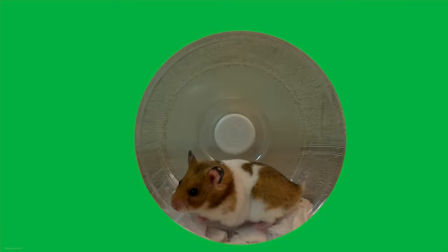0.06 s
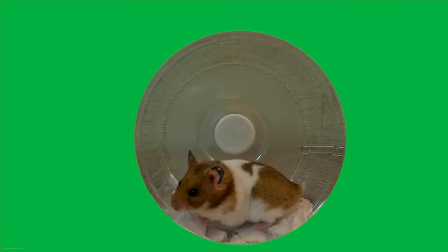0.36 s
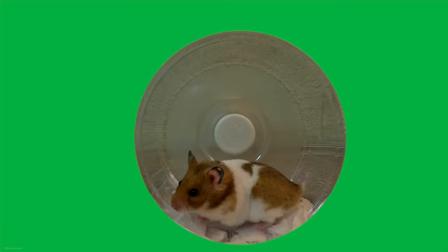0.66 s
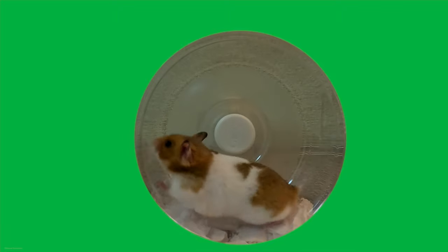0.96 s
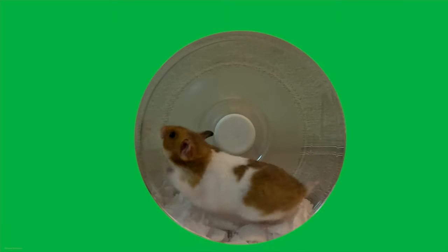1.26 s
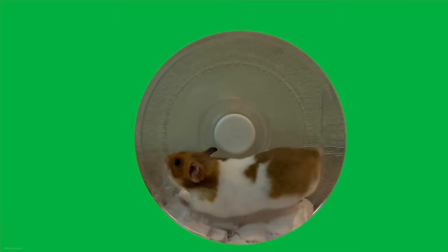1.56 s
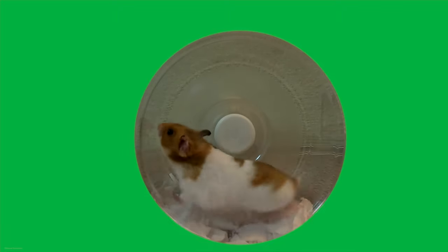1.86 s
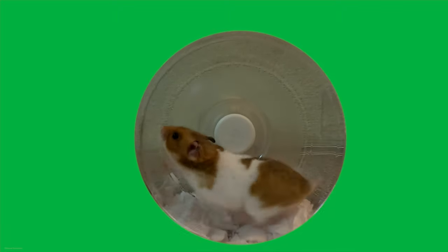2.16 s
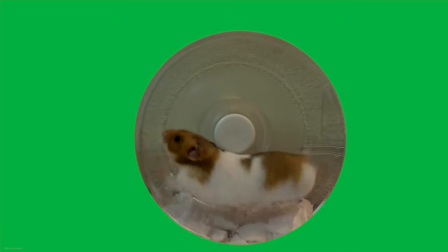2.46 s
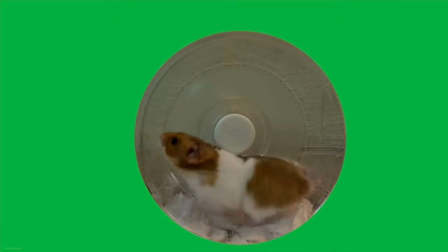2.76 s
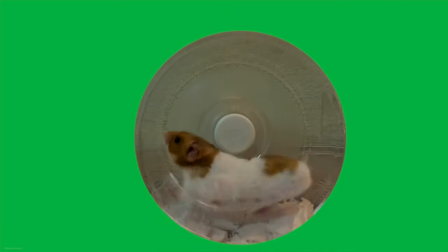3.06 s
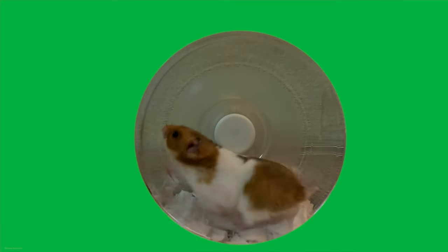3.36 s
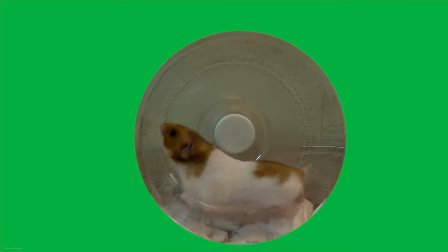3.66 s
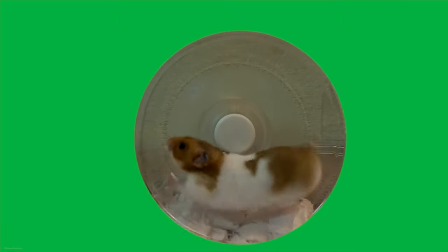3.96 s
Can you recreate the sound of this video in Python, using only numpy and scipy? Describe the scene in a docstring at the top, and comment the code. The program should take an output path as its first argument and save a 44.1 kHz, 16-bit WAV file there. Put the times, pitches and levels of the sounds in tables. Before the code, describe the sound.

A plastic exercise wheel rumbles and rattles as a hamster's claws tick on it.

```python
"""Hamster in a plastic wheel

A quiet room, stereo microphone close to the wheel, which stands slightly to the right.
The hamster walks, then runs: its strides thump wheel and stand, which rumble in low modes,
and its claws tick on the drum. At speed the drum rattles and clacks on its loose axle.
Now and then plastic slips on plastic with a faint squeak."""
import sys
import numpy as np
from scipy import signal
from scipy.fft import rfft, irfft
from scipy.io import wavfile
from scipy.ndimage import uniform_filter1d

SR = 44100
rng = np.random.default_rng(int(sys.argv[2]) if len(sys.argv) > 2 else 0)


def put_to_file(sound):
    """Save the sound as 16-bit audio at rate SR, in the file named by the first command-line argument."""
    columns = np.atleast_2d(sound).T  # one column per channel
    safe = np.clip(columns, -1, 1)
    whole_steps = np.round(safe * 32767)
    wavfile.write(sys.argv[1], SR, whole_steps.astype(np.int16))


N = 176400
T = np.arange(N) / SR


def undb(db):
    """Decibels to gain."""
    return 10 ** (np.asarray(db) / 20)


def unit(x):
    """Scale to rms 1."""
    return x / np.sqrt(np.mean(x ** 2))


def curve(points):
    """Gain over time from points of t/s, level/dB."""
    return undb(np.interp(T, *np.array(points).T))


def gains(points):
    """Gain at every frequency from points of f/Hz, level/dB."""
    hz, db = np.array(points).T
    bin_hz = np.arange(N + 1) * SR / (2 * N)
    return undb(np.interp(np.log(bin_hz + 1e-9), np.log(hz), db))


def colour(x, points):
    """Causal filter with the given spectrum; white noise keeps its level."""
    cepstrum = irfft(np.log(unit(gains(points))))
    cepstrum[1:N] *= 2  # fold to minimum phase
    cepstrum[N + 1:] = 0
    return irfft(rfft(x, 2 * N) * np.exp(rfft(cepstrum)))[:N]


def cut(x, hz, kind, order=2):
    """Low-pass or high-pass."""
    return signal.sosfilt(signal.butter(order, hz, kind, fs=SR, output="sos"), x)


def grains(per_s, spread_db):
    """Random tiny impacts of uneven size, rms 1."""
    impacts = (rng.random(N) < per_s / SR) * np.sign(rng.standard_normal(N))
    return unit(impacts * undb(spread_db * np.clip(rng.standard_normal(N), -2, 2)))


def add(out, start, x):
    """Mix x in at start seconds."""
    i = max(int(start * SR), 0)
    out[i:i + len(x)] += x[:max(N - i, 0)]


def ring(modes, jitter=0.0078, size=SR // 2):
    """Struck modes (f/Hz, t60/s, level/dB), each slightly detuned."""
    t = T[:size]
    return sum(undb(db) * np.exp(-np.log(1000) * t / t60)
               * np.sin(2 * np.pi * hz * (1 + jitter * rng.standard_normal()) * t)
               for hz, t60, db in modes)


def resonate(x, response):
    """Pass x through a ringing body, its response scaled to unit energy."""
    return signal.fftconvolve(x, response / np.sqrt(np.sum(response ** 2)))[:len(x)]


# Spectrum of the quiet room: f/Hz, relative level/dB
ROOM_SPECTRUM = [(12, -27), (20, 2.5), (33, -7), (80, -30.5), (161, -14.5), (248, -15), (299, -13.5),
                 (390, -23.5), (700, -30), (1400, -30.5), (2100, -40.5), (7410, -44.5), (12000, -59.5)]
def room_tone():
    """Steady faint air all around the microphone, a little stronger on the right."""
    level_db, width, right_db = -65.5, 0.69, 3.5
    mid, side = (colour(rng.standard_normal(N), ROOM_SPECTRUM) for _ in range(2))
    left_right = np.array([[1], [-1]])
    return undb(level_db - left_right * right_db / 2) * (mid + width * side * left_right)


def reflections(x, t60_s=0.11):
    """A short diffuse tail from the surfaces near the wheel."""
    t = T[:SR // 2]
    tail = rng.standard_normal(len(t)) * np.exp(-np.log(1000) * t / t60_s)
    return resonate(x, tail * (1 - np.exp(-t / 0.00033)))


def slip(length, from_hz, to_hz, db, octave_db):
    """Plastic slipping on plastic: an unsteady glide and its octave; long ones catch and restart."""
    longest_spurt_s = 0.08
    progress = np.arange(int(length * SR)) / (length * SR)
    waver, flutter = (unit(cut(rng.standard_normal(SR), 300, "low"))[-len(progress):] for _ in range(2))
    hz = (from_hz + (to_hz - from_hz) * progress) * (1 + 0.023 * waver)
    phase = 2 * np.pi * np.cumsum(hz) / SR
    tone = np.sin(phase) + undb(octave_db) * np.sin(2 * phase)
    spurts = np.abs(np.sin(np.pi * progress * np.ceil(length / longest_spurt_s)))
    return undb(db) * spurts * (1 + 0.65 * flutter) * tone


# Squeaks of the wheel: t/s, length/s, start f/Hz, end f/Hz, level/dB, octave re fundamental/dB
WHEEL_SQUEAKS = [(1.574, .31, 7180, 7200, -78.5, -24), (1.836, 0.061, 1340, 1875, -69.5, -14),
                 (1.989, 0.031, 2820, 2540, -69.5, -22), (2.061, 0.077, 2930, 2350, -65.5, -15),
                 (2.159, .055, 2233, 1820, -68.5, -17.5), (3.339, 0.038, 2670, 3326, -62, -14.5),
                 (3.76, 0.034, 3510, 3910, -58, -9.5)]
def squeaks():
    """The turning wheel gives a few clear squeaks among many tiny creaks."""
    out = np.zeros(N)
    for start, *shape in WHEEL_SQUEAKS:
        add(out, start, slip(*shape))
    first_creak_s, creaks_per_s, low_hz, high_hz = 1.14, 26, 1350, 2400
    for k, (late, pitch, glide, size) in enumerate(rng.random((80, 4))):
        from_hz = low_hz * (high_hz / low_hz) ** pitch
        to_hz = from_hz * (1 + 0.35 * (glide - 0.5))
        creak = slip(0.018, from_hz, to_hz, db=-74 + 8 * (size - 0.5), octave_db=-19.5)
        add(out, first_creak_s + (k + late) / creaks_per_s, creak)
    return out


# Clacks of the loose axle: t/s, level/dB
AXLE_CLACKS = [(2.422, -55.5), (2.454, -53), (2.521, -53), (2.542, -60), (2.571, -47.5), (2.615, -52.5),
               (2.665, -52.5), (2.71, -58.5), (2.807, -50), (2.856, -55), (3.188, -55), (3.217, -60),
               (3.237, -48.5), (3.287, -56.5)]
# Modes of the axle: f/Hz, t60/s, relative level/dB
AXLE_MODES = [(925, 0.025, 5.5), (1600, 0.015, -11), (2666, 0.024, 0), (2820, 0.017, 1.5), (4920, 0.013, 4)]
def axle_clacks():
    """The axle chatters in its bearing: a tiny crack and a ring that differs every time."""
    rise_s, crack_s = 0.001, 0.002
    out, t = np.zeros(N), T[:SR // 10]
    for start, db in AXLE_CLACKS:
        modes = [(hz, t60, mode_db + rng.normal(0, 2)) for hz, t60, mode_db in AXLE_MODES]
        tone = ring(modes, jitter=0.023, size=len(t))
        crack = np.exp(-t / crack_s) * unit(cut(rng.standard_normal(len(t)), 4000, "low"))
        add(out, start, undb(db) * (tone + crack) * (1 - np.exp(-t / rise_s)))
    return out


# Claws landing: t/s, relative level/dB, treble above 5 kHz/dB, scratch length/s, ring of the spot f/Hz
CLAW_LANDINGS = [(1.009, -72, 1, 0.049, 4000), (1.113, -61.5, -1.5, 0.012, 4090),
                 (1.243, -63.5, 4, 0.0062, 4190), (1.297, -63, -8, 0.017, 4300),
                 (1.354, -63, 1.5, 0.0062, 4060), (1.402, -61, -2.5, 0.015, 3250),
                 (1.45, -68, 9.5, 0.015, 6200), (1.501, -62.5, 12.5, 0.0097, 6100),
                 (1.539, -70, 9.5, .008, 4200), (1.652, -60.5, 5, 0.0082, 3680),
                 (1.704, -63.5, 2, 0.0082, 4490), (1.803, -62, -2.5, 0.015, 3300),
                 (1.901, -61.5, -4, 0.0075, 3760), (1.922, -58.5, -0.5, 0.015, 4170),
                 (2.021, -63, -2, 0.0086, 4200), (2.055, -60.5, -1.5, 0.03, 2730),
                 (2.147, -60.5, -9, 0.013, 6630), (2.171, -48.5, -3, 0.0028, 4150),
                 (2.214, -67.5, 8, 0.015, 6200), (2.287, -55, -4.5, 0.0062, 4400),
                 (2.374, -55.5, -12.5, 0.031, 3940), (2.401, -53.5, -11, 0.014, 6800),
                 (2.485, -53, -17.5, 0.025, 3600), (2.587, -60.5, -6, .012, 6770),
                 (2.682, -58.5, -2, 0.011, 3820), (2.756, -55.5, -8, 0.018, 3250),
                 (2.781, -55.5, -3, 0.0091, 4330), (2.844, -63, 3.5, 0.012, 3800),
                 (2.867, -62.5, -11, 0.027, 6700), (2.945, -60.5, -3.5, 0.028, 3010),
                 (3.044, -60, -7.5, 0.029, 3750), (3.161, -53.5, -16.5, 0.023, 6560),
                 (3.26, -55.5, -3, 0.012, 4180), (3.357, -59.5, -3, 0.0063, 6700),
                 (3.382, -52.5, -6.5, 0.014, 3840), (3.467, -60, -1.5, 0.013, 4330),
                 (3.556, -57.5, -3.5, 0.01, 3150), (3.567, -55.5, -15, 0.019, 4460),
                 (3.633, -57.5, 2, 0.0093, 3220), (3.648, -50.5, -24, 0.012, 3210),
                 (3.733, -50, -4.5, 0.0093, 6580), (3.812, -61.5, -2, 0.012, 4200),
                 (3.835, -58.5, -1.5, 0.019, 3880), (3.907, -56.5, 0, 0.0089, 2850),
                 (3.92, -58, -9, 0.02, 4300), (3.986, -61.5, -1.5, 0.022, 2570)]
# High modes of the plastic under a claw: f/Hz, relative level/dB
CLAW_MODES = [(1680, -2.5), (2300, -4.5), (3230, 0), (3780, -0.5), (4300, -1.5), (6650, -4), (7250, -7.5)]
# Spectrum of a claw on plastic: f/Hz, relative level/dB
CLAW_SPECTRUM = [(400, -16), (1600, 0), (2500, -2), (3200, -2), (4300, 0.5), (5300, -4), (6700, -3),
                 (8200, -8), (10500, -17.5), (12000, -17)]
# Fur and feet brushing the drum: t/s, relative level/dB
BRUSH_LEVEL = [(.95, -112), (1.04, -79.5), (2.1, -76.5), (4, -76)]
def claws_and_fur():
    """Each paw lands with a gritty scratch that rings the spot it hits; fur and feet brush the drum."""
    rise_s, ring_t60_s = 0.0016, 0.027
    tick_db, modes_db, spot_db = -3.5, -4, 3.5
    ticks, rings, t = np.zeros(N), np.zeros(N), T[:SR // 5]
    attack = 1 - np.exp(-t / rise_s)
    grit = grains(per_s=1498, spread_db=3)
    body, treble = cut(grit, 4500, "low", order=3), cut(grit, 5100, "high", order=3)
    for start, db, treble_db, length, spot_hz in CLAW_LANDINGS:
        part = rng.integers(N - len(t)) + np.arange(len(t))
        envelope = undb(db) * attack * np.exp(-(t / length) ** 1.3)
        scratch = envelope * (body[part] + undb(treble_db) * treble[part])
        modes = [(hz, ring_t60_s, mode_db + rng.normal(0, 2.7)) for hz, mode_db in CLAW_MODES]
        plastic = ring(modes, jitter=0.02, size=len(t))
        spot = ring([(spot_hz, ring_t60_s, 0)], size=len(t))
        add(ticks, start, scratch)
        add(rings, start, undb(modes_db) * resonate(scratch, plastic))
        add(rings, start, undb(db + spot_db) * attack * spot)
    brush = grains(per_s=450, spread_db=5) * curve(BRUSH_LEVEL)
    return rings + colour(undb(tick_db) * ticks + reflections(brush), CLAW_SPECTRUM)


# The drum rattling on its axle: t/s, relative level/dB
RATTLE_LEVEL = [(.95, -101), (1.13, -73), (1.78, -74.5), (1.94, -68), (2.26, -73), (2.3, -51),
                (2.36, -54.5), (2.43, -50), (2.61, -46.5), (2.72, -50), (2.81, -46.5), (3.02, -57),
                (3.13, -47), (3.19, -47.5), (3.29, -48), (3.33, -60), (3.42, -53), (3.53, -63.5),
                (3.58, -50), (3.68, -49), (3.8, -64.5), (3.88, -68), (3.95, -52.5), (4, -57)]
# The drum knocking against the stand: t/s, relative level/dB
STAND_KNOCKS = [(2.407, -39), (2.49, -36), (2.571, -35), (2.589, -32.5), (2.68, -39.5), (2.782, -37.5),
                (3.182, -30.5), (3.57, -43), (3.65, -45.5)]
# Spectrum of the rattle: f/Hz, relative level/dB
RATTLE_SPECTRUM = [(120, -31), (210, 3.5), (260, 10), (370, -4), (470, -7), (1000, -17.5), (1270, -28.5),
                   (1700, -22.5), (3000, -29), (5000, -39), (8000, -53), (12000, -66)]
# Modes of the drum's shell: f/Hz, t60/s, relative level/dB
SHELL_MODES = [(396.2, 0.14, 9.5), (514, 0.035, 2), (567, 0.037, -1.5), (700, 0.02, 3.5), (843, 0.15, -2),
               (931, 0.031, -2.5), (1424, 0.06, -10)]
def drum_rattle():
    """Dense small impacts and a few hard knocks ring the drum's hollow shell."""
    knock_decay_s, crack_db, shell_db = 0.0086, -1.5, -8
    impacts = grains(per_s=997, spread_db=3.5) * curve(RATTLE_LEVEL)
    t = T[:SR // 10]
    for start, db in STAND_KNOCKS:
        add(impacts, start, undb(db) * np.exp(-t / knock_decay_s) * rng.standard_normal(len(t)))
    shell = resonate(impacts, ring(SHELL_MODES, jitter=0.0021))
    return undb(crack_db) * colour(impacts, RATTLE_SPECTRUM) + undb(shell_db) * shell


# Low modes of wheel and stand, rung by rolling and by strides: f/Hz, t60/s, relative level/dB
WHEEL_MODES = [(24.5, 0.6, -20), (43.6, 0.46, -22), (62.7, 0.29, -2), (96.6, 0.21, -5.5),
               (126.75, 0.25, -0.5), (146.4, 0.16, -4), (179.1, 0.22, 2)]
# Rolling of the wheel: t/s, level/dB
ROLL_LEVEL = [(0, -74.5), (.78, -86), (.83, -66.5), (.95, -65), (1.1, -52), (1.32, -41.5), (1.62, -38.5),
              (1.78, -42), (1.95, -32.5), (2.26, -39), (2.32, -23), (2.5, -26.5), (2.8, -31), (3.1, -28.5),
              (3.3, -32.5), (3.65, -28), (3.82, -33.5), (4, -30)]
WHEEL_TOP_HZ = 208
def rolling_rumble():
    """The rolling drum keeps the low modes of wheel and stand going, favouring the lowest."""
    tilt_db_per_octave = -5
    roll = np.zeros(N)
    for hz, t60, db in WHEEL_MODES:
        driven = signal.fftconvolve(rng.standard_normal(N), ring([(hz, t60, 0)], jitter=0.00061))[:N]
        roll += undb(db + tilt_db_per_octave * np.log2(hz / 60)) * unit(driven)
    roll = cut(cut(roll, WHEEL_TOP_HZ, "low", order=8), 16, "high", order=4)
    running_rms = np.sqrt(uniform_filter1d(roll ** 2, int(0.09 * SR)) + 1e-9)
    return roll / running_rms * curve(ROLL_LEVEL)


# Strides that shake the wheel: t/s, relative level/dB, weight of the lowest modes/dB
STRIDES = [(1.122, -28, -14.5), (1.245, -33.5, -15.5), (1.389, -44, -4), (1.478, -37.5, -2.5),
           (1.556, -36.5, -7), (1.625, -34, -20), (1.855, -37, 4.5), (1.905, -31, 7), (2.059, -30, -7.5),
           (2.3, -22.5, -2.5), (2.385, -21.5, 2), (2.49, -18.5, -7), (2.583, -29, -5), (2.674, -24.5, -21),
           (2.776, -36, -8.5), (2.872, -19, -1), (2.991, -28, -5.5), (3.077, -39, -7.5), (3.16, -25.5, 7.5),
           (3.276, -31.5, 2), (3.39, -20, -9.5), (3.575, -19.5, -3.5), (3.665, -22.5, -3.5),
           (3.742, -31.5, -1), (3.925, -25, -11.5)]
def stride_thumps():
    """Every stride swells the low modes of wheel and stand into a soft thump."""
    rise_s = 0.014
    thumps = np.zeros(N)
    for start, db, weight_db in STRIDES:
        modes = [(hz, t60, mode_db + weight_db * np.clip(np.log(175 / hz), 0, 1))
                 for hz, t60, mode_db in WHEEL_MODES]
        thump = ring(modes, jitter=0.018)
        attack = 1 - np.exp(-T[:len(thump)] / rise_s)
        add(thumps, start, undb(db) * attack * thump)
    return undb(3) * cut(thumps, WHEEL_TOP_HZ, "low", order=6)


# Stereo width at the microphone: f/Hz, side gain/dB
STEREO_WIDTH = [(25, 0.5), (60, -21.5), (170, -21), (260, -11.5), (500, -4.5), (1000, -5.5), (4000, -11),
                (12000, -7.5)]
# Balance at the microphone: f/Hz, left minus right/dB
STEREO_BALANCE = [(30, 1), (130, -1.04), (280, -3), (600, -4), (1200, -0.5), (4000, -1.2), (8000, 1.5),
                  (11000, 8)]
def scene():
    """The wheel stands close to the microphone, slightly to the right; reflections widen it."""
    patter = drum_rattle() + claws_and_fur() + axle_clacks() + squeaks()
    mono = rolling_rumble() + stride_thumps() + patter + undb(-6) * reflections(patter)
    mid = rfft(mono, 2 * N)
    side = rfft(reflections(mono), 2 * N) * gains(STEREO_WIDTH)
    lean = np.sqrt(gains(STEREO_BALANCE))
    left, right = irfft((mid + side) * lean)[:N], irfft((mid - side) / lean)[:N]
    return np.array([left, right]) + room_tone()


def record(dry):
    """The recorder cuts the top steeply above 12.4 kHz."""
    return signal.sosfilt(signal.ellip(8, 0.2, 70, 12400, fs=SR, output="sos"), dry)


dry = scene()
out = record(dry)
put_to_file(out)
```